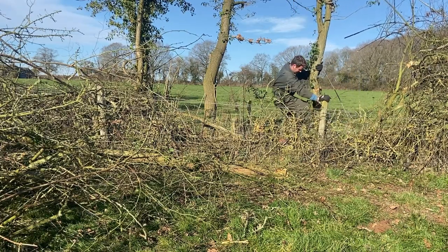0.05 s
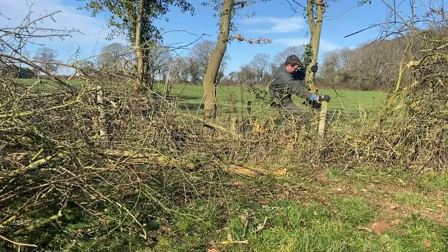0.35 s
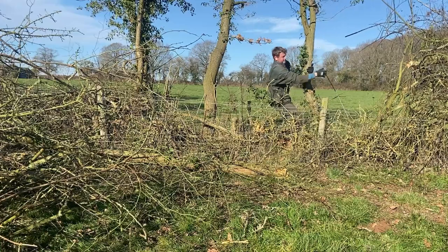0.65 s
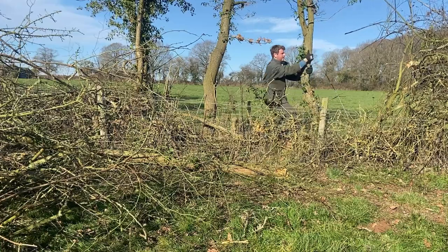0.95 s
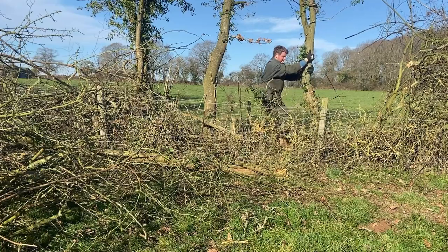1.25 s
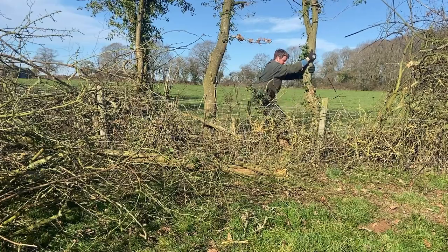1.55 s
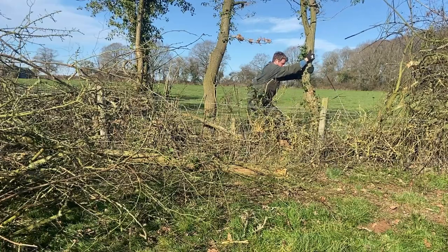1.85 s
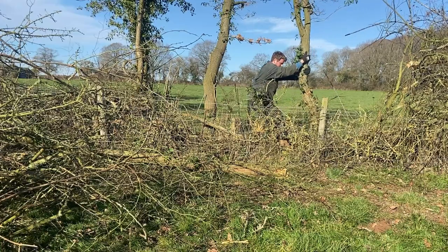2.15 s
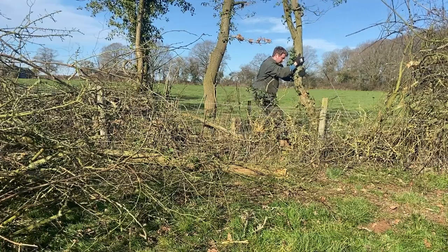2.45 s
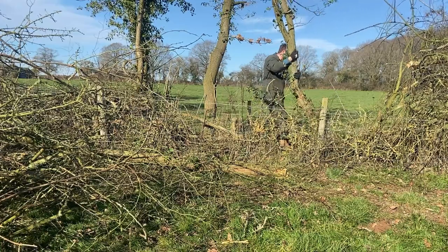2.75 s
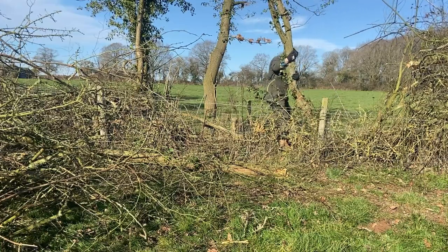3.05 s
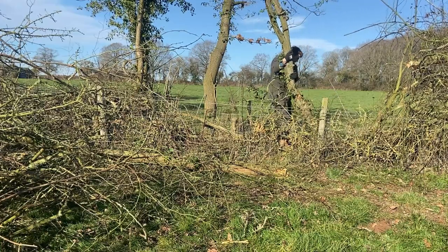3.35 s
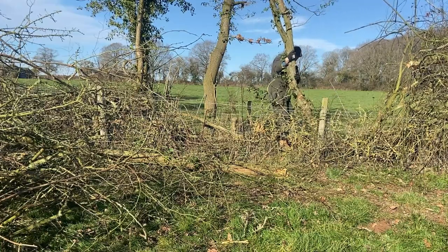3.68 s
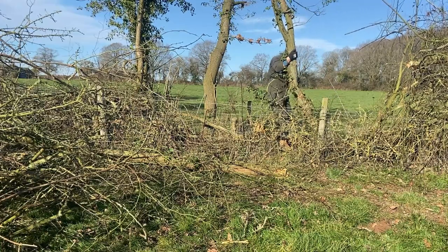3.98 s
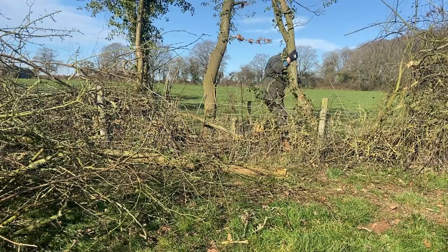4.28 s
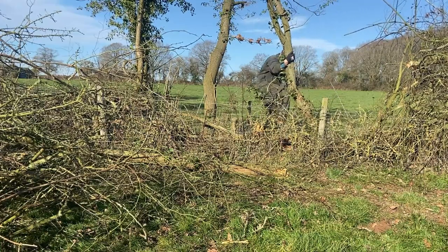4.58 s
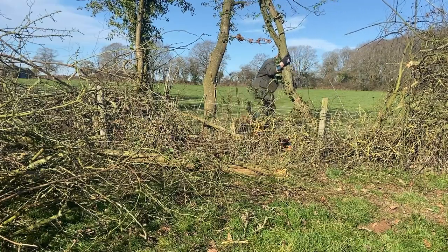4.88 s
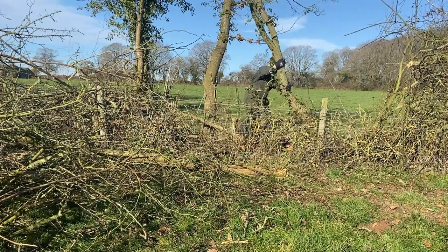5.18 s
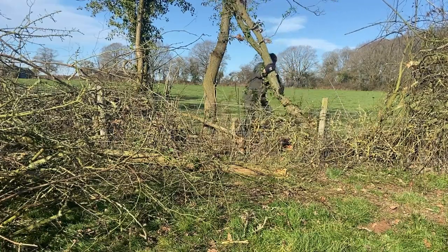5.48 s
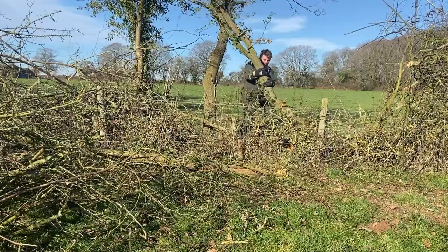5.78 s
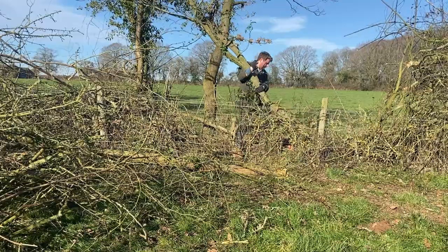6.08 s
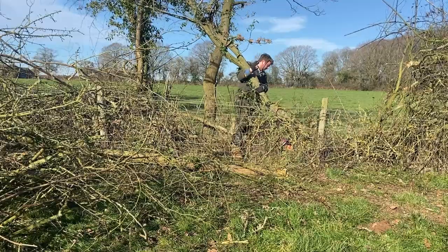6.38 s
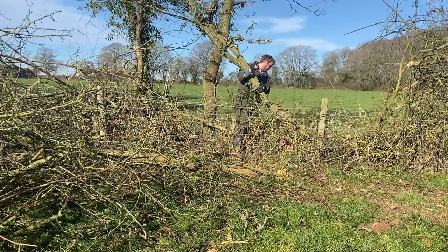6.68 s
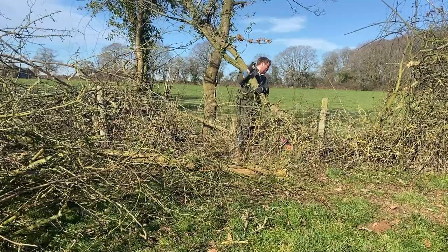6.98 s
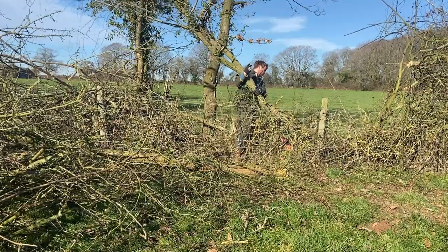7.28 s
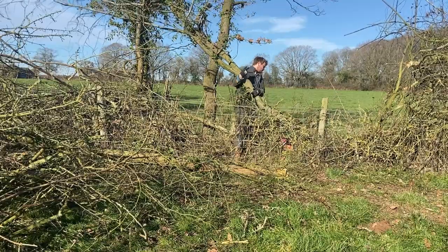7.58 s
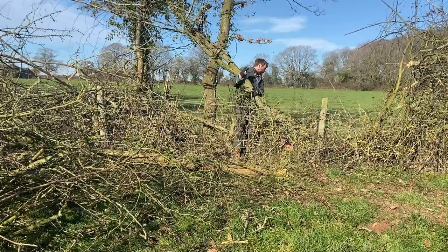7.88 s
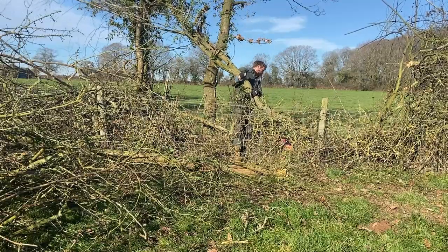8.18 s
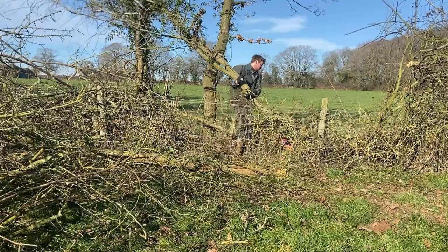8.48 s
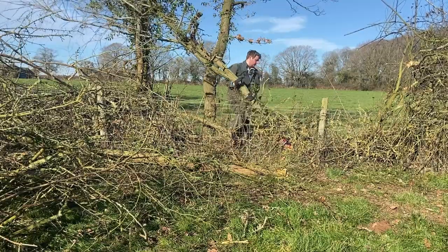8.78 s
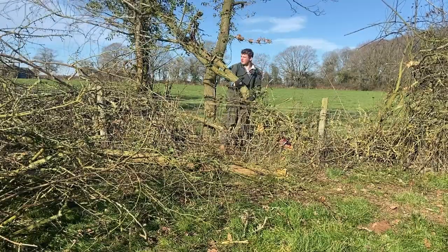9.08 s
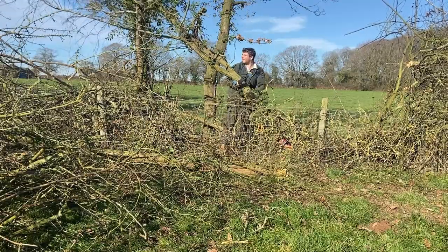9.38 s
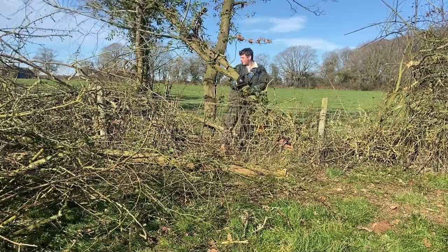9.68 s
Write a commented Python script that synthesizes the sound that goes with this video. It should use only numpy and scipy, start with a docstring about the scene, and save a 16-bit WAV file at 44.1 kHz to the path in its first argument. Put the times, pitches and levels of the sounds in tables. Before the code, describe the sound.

A partly cut trunk snaps and crackles as it bends over into a hedge, amid rustling brush outdoors.

```python
"""A partly cut tree is hauled down sideways onto a laid hedge, at the edge of an open field.
First a breeze buffets the close microphone pair, boots tread the litter, twigs rustle and bark squeaks.
From 2 s fibres in the bent hinge of the trunk snap in a volley; each break rings the stem's modes and
scatters back from the brushwood. The loudest volley comes between 5 and 6.5 s. A boot lands at 7 s,
then lighter cracks and shoves through the brush die away."""
import sys
import numpy as np
from scipy import signal
from scipy.fft import rfft, irfft, next_fast_len
from scipy.io import wavfile

SR = 44100
rng = np.random.default_rng(int(sys.argv[2]) if len(sys.argv) > 2 else 0)


def put_to_file(sound):
    """Save the sound as 16-bit audio at rate SR, in the file named by the first command-line argument."""
    columns = np.atleast_2d(sound).T  # one column per channel
    safe = np.clip(columns, -1, 1)
    whole_steps = np.round(safe * 32767)
    wavfile.write(sys.argv[1], SR, whole_steps.astype(np.int16))


N = 438354
CUTOFF_HZ = 16000


def from_db(db):
    """Amplitude ratio of a level: 20 dB per decade."""
    return 10 ** (np.asarray(db) / 20)


def rms_one(x):
    """Normalisation to unit rms."""
    return x / np.sqrt(np.mean(x ** 2) + 1e-20)


def in_time(curve):
    """Linear interpolation of a curve at every sample."""
    return np.interp(np.arange(N) / SR, *np.transpose(curve))


def at_hz(points, hz):
    """Interpolation on a logarithmic frequency axis."""
    f, value = np.transpose(points)
    return np.interp(np.log(np.maximum(hz, 1)), np.log(f), value)


def bell(middle_s, length_s):
    """Gaussian envelope of unit height."""
    return np.exp(-np.minimum((2 * (np.arange(N) / SR - middle_s) / length_s) ** 2, 30))


def band(x, low_hz, high_hz):
    """Butterworth band-pass."""
    return signal.sosfilt(signal.butter(2, [low_hz, high_hz], "band", fs=SR, output="sos"), x)


def resonate(x, hz, width_hz):
    """Damped oscillator with unit gain at resonance."""
    r = np.exp(-np.pi * width_hz / SR)
    poles = [1, -2 * r * np.cos(2 * np.pi * hz / SR), r * r]
    return signal.lfilter(np.array([1, 0, -1]) * (1 - r * r) / 2, poles, x + 1e-18)


def drift(corner_hz):
    """Random modulation: low-passed noise of unit rms."""
    hop, settle = 40, 2000
    r = np.exp(-2 * np.pi * corner_hz * hop / SR)
    slow = signal.lfilter([1], [1, -2 * r, r * r], rng.standard_normal(N // hop + settle + 2))[settle:]
    return np.interp(np.arange(N) / hop, np.arange(len(slow)), rms_one(slow))


# Likeness of the sound at the two microphones: f/Hz, coherence
COHERENCE = [(30, 0.86), (300, 0.89), (3000, 0.89), (4800, 1), (6000, 0.31), (6900, 1), (13000, 1),
             (16000, .7)]

def stereo_noise(spectrum):
    """Partial coherence: close microphones receive nearly the same coloured noise; unit rms."""
    size = next_fast_len(N)
    hz = np.fft.rfftfreq(size, 1 / SR)
    mid, side = rfft(rng.standard_normal((2, size)))
    alike = np.clip(at_hz(COHERENCE, hz), 0, 1)
    pair = np.sqrt(1 + alike) * mid + np.sqrt(1 - alike) * side * [[1], [-1]]
    return rms_one(irfft(pair * from_db(at_hz(spectrum, hz)))[:, :N])


# Steady breeze: t/s, level/dB
BREEZE = [(0.0, -59.5), (2.4, -51), (3.05, -60), (6.1, -53.5), (6.7, -57), (7.9, -55), (8.5, -48.5),
          (9.93, -53)]
# Gusts: centre t/s, duration/s, level/dB
GUSTS = [(1.168, .1, -52), (1.799, 0.088, -46), (2.01, 0.15, -40.5), (2.199, 0.075, -33.5),
         (2.358, .07, -40.5), (2.543, 0.2, -41), (4.851, 0.23, -49), (7.028, 0.11, -45), (8.14, 0.072, -45),
         (8.38, 0.092, -45), (8.789, 0.077, -41.5)]
# Spectrum of the buffeting: f/Hz, level/dB
WIND_SPECTRUM = [(20, -26.5), (40, -4.5), (62, 3.5), (100, -2), (160, -12), (260, -35), (500, -51.5)]

def breeze():
    """Turbulent pressure: eddies press on the microphone ports; breeze and gusts add in power."""
    power = from_db(in_time(BREEZE)) ** 2
    power += sum((from_db(db) * bell(s, length)) ** 2 for s, length, db in GUSTS)
    return np.sqrt(power) * from_db(-1.8 + 2.65 * drift(18)) * stereo_noise(WIND_SPECTRUM)


# Load on the hinge, as the level of its creaking: t/s, level/dB
STRAIN = [(0.0, -68), (0.22, -70.5), (0.7, -63), (1.72, -64), (1.88, -75), (2.08, -70), (2.6, -57),
          (3.3, -66.5), (4.05, -67), (4.75, -59.5), (5.0, -53.5), (5.7, -51.5), (6.35, -54), (6.8, -64.5),
          (7.4, -61), (8.7, -59.5), (9.93, -64.5)]
# Shoves through the brush: centre t/s, duration/s, twig level/dB, fibre level/dB, litter level/dB
SHOVES = [(0.125, 0.087, -63, -63, -62), (0.351, .13, -47.5, -79, -59.5), (0.466, 0.097, -39, -65, -58),
          (0.609, 0.12, -50.5, -68, -64), (0.833, 0.096, -57.5, -55, -58), (1.177, 0.31, -49, -77, -60.5),
          (1.485, 0.16, -56.5, -59.5, -57.5), (1.671, 0.24, -60.5, -55, -64), (2.521, .14, -47, -52, -54),
          (2.919, 0.19, -54.5, -69, -69), (3.296, 0.088, -49.5, -64, -68), (3.64, 0.2, -53, -58.5, -61.5),
          (3.88, .09, -59, -63, -64), (4.259, 0.2, -48.5, -59.5, -58.5), (6.522, 0.26, -49.5, -66, -59),
          (7.02, .08, -47.5, -49.5, -54), (7.12, 0.081, -50.5, -51.5, -56.5), (7.408, 0.13, -48, -48, -75),
          (7.598, 0.083, -49.5, -58, -50.5), (7.786, 0.0996, -55.5, -54.5, -77),
          (8.15, 0.17, -53, -65, -68), (8.541, 0.34, -45, -52.5, -52), (8.74, .17, -46, -53, -50),
          (8.998, 0.2, -44, -53, -51), (9.2, 0.18, -57.5, -61, -54.5), (9.422, 0.16, -44.5, -75.5, -64.5),
          (9.592, 0.077, -54, -67.5, -54.5), (9.766, 0.058, -58, -73.5, -54)]

def stirring():
    """Incoherent sources add in power: load plus shoves gives the twig, fibre and litter levels."""
    strain_db = in_time(STRAIN)
    power = from_db([strain_db + 3.5, strain_db, strain_db - 5]) ** 2
    for s, length, *levels_db in SHOVES:
        power += np.outer(from_db(levels_db), bell(s, length)) ** 2
    return 10 * np.log10(power)


def grains(spectrum, per_s, spread_db, low_hz, high_hz, q, modes=14):
    """Shot noise: tiny fractures arrive in clumps, each ringing briefly about its own pitch; unit rms."""
    chance, clumps = rng.random(N), from_db(4 * drift(18))
    sizes = from_db(spread_db * np.minimum(rng.exponential(1, N), 3.5)) * rng.choice([-1, 1], N)
    pitch = rng.random(N) * modes
    at = np.flatnonzero(chance < per_s * clumps / SR)
    out = np.zeros((2, N))
    for k, hz in enumerate(np.geomspace(low_hz, high_hz, modes)):
        clicks = np.zeros(N)
        clicks[at] = sizes[at] * np.exp(-((pitch[at] - k) / 6) ** 2)  # spills into neighbouring modes
        clicks[at] *= rng.normal(0.52, 1.0, len(at))
        pan = from_db(rng.normal(0, 1) * np.array([[1], [-1]]))
        out += from_db(at_hz(spectrum, hz)) * pan * resonate(clicks, hz, hz / q)
    return rms_one(out)


# Spectra of twigs, creaking fibres and ground litter: f/Hz, level/dB
TWIG_SPECTRUM = [(400, -10.5), (1000, -4.5), (2000, -5), (3000, 3), (4300, -0.5), (5600, -2.5), (8500, 0),
                 (11500, -2.5), (14000, -10), (16000, -31)]
FIBRE_SPECTRUM = [(400, -10.5), (650, 2), (900, 5.5), (1400, 3), (2000, 1.5), (2800, -2.5), (5000, -24.5)]
LITTER_SPECTRUM = [(100, -3), (170, 3), (280, 3.5), (420, -1), (650, -4), (1200, -32)]

def rustle(twig_db, fibre_db, litter_db):
    """Superposition: harder movement breaks more twigs and fibres; the finest merge into a hiss."""
    busy = from_db(.8 * (twig_db + 54))
    ticks = grains(TWIG_SPECTRUM, per_s=600 * busy, spread_db=12.5, low_hz=1570, high_hz=16000, q=6.2)
    swish = stereo_noise(TWIG_SPECTRUM) * from_db(1.6 * drift(22))
    twigs = from_db(-6.5) * ticks + from_db(-0.5) * swish
    creaks = grains(FIBRE_SPECTRUM, per_s=200 * busy, spread_db=5.5, low_hz=618, high_hz=3820, q=13)
    rubbing = stereo_noise(FIBRE_SPECTRUM) * from_db(3.8 * drift(27))
    fibres = from_db(-3.5) * creaks + from_db(-3) * rubbing
    litter = from_db(1.5) * stereo_noise(LITTER_SPECTRUM) * from_db(2.9 * drift(27))
    return from_db(twig_db) * twigs + from_db(fibre_db) * fibres + from_db(litter_db) * litter


# Faint bark squeaks: t/s, duration/s, start f/Hz, end f/Hz, level/dB
SQUEAKS = [(0.786, 0.073, 2710, 2220, -58), (0.954, 0.087, 751, 1020, -46.5)]

def squeaks():
    """Friction: bark rubs on bark in short, unsteady glides that swell, stutter and stop."""
    out, waver, stutter = np.zeros(N), drift(120), from_db(4.5 * drift(150))
    for s, length, start_hz, end_hz, db in SQUEAKS:
        at, progress = int(s * SR), np.linspace(0, 1, int(length * SR))
        span = slice(at, at + len(progress))
        hz = (start_hz + (end_hz - start_hz) * progress) * (1 + 0.055 * waver[span])
        swell = from_db(db) * np.sin(np.pi * progress ** 1.27)
        out[span] += swell * np.sin(2 * np.pi * np.cumsum(hz) / SR)
    return out * stutter


# Boots landing in the litter: t/s, level/dB, T60/s
STEPS = [(0.316, -50.5, 0.072), (1.454, -48, .06), (4.418, -40, 0.054), (6.977, -30.5, 0.12),
         (8.948, -41, 0.18), (9.054, -32.5, 0.044)]

def steps():
    """Impact noise: each boot gives a soft thump and a crunch that decay exponentially."""
    t, press = np.arange(N) / SR, np.zeros(N)
    for s, db, t60 in STEPS:
        age = np.maximum(t - s, 0)
        press += from_db(db - 60 * age / t60) * (1 - np.exp(-age / 0.00062))
    thump = rms_one(band(rng.standard_normal(N), 255, 490))
    return press * (from_db(-2) * thump + stereo_noise(TWIG_SPECTRUM))


def fracture(t, slip_s, scatter_db, brush_db, brush_t60):
    """Scattering: an impulse and its after-slips, then returns from near stems and the whole hedge."""
    slips = rng.standard_normal(len(t)) * (rng.random(len(t)) < .12) * .5 * np.exp(-t / slip_s)
    slips[0] = 1
    returns = from_db(scatter_db - 60 * t / 0.016) + from_db(brush_db - 60 * t / brush_t60)
    mid, side = rng.standard_normal((2, len(t)))
    diffuse = (mid + 0.49 * side * [[1], [-1]]) * returns * (1 - np.exp(-t / 0.0012))
    return slips / np.linalg.norm(slips) + diffuse


def struck_level(x, db):
    """Normalisation of a transient by the rms of its first 6 ms."""
    return x * from_db(db) / np.sqrt(np.mean(x[:, :int(.006 * SR)] ** 2) + 1e-20)


# Treble of splintering wood: f/Hz, level/dB
SPLINTER_SPECTRUM = [(2500, -9.5), (4000, -0.5), (5000, 0.5), (6400, -1.5), (8500, -0.5), (11500, -1.5),
                     (14000, -13), (16000, -26)]

def splinter(force, size=512):
    """Minimum-phase filtering turns the force into a bright snap with a sharp onset."""
    magnitude = from_db(at_hz(SPLINTER_SPECTRUM, np.fft.rfftfreq(size, 1 / SR)))
    cepstrum = irfft(np.log(magnitude))
    cepstrum[1:size // 2] *= 2
    cepstrum[size // 2 + 1:] = 0
    response = irfft(np.exp(rfft(cepstrum)))
    return signal.fftconvolve(force, response[None])[:, :force.shape[1]]


# Resonances of the green stem: f/Hz, bandwidth/Hz, level/dB
WOOD_MODES = [(764, 67, -10.5), (901, 40, 0), (1244, 160, 0.5), (1475, 172, 3), (1670, 110, 1),
              (2530, 150, -0.5), (2586, 660, 8.5), (2890, 510, 3.5), (3540, 400, -6)]

def wood_modes(force, tuning, spread_db):
    """Modal response: the force rings each resonance with a random strength; one signal per mode."""
    return [from_db(db + rng.normal(0, spread_db)) * resonate(force, hz * tuning, width)
            for hz, width, db in WOOD_MODES]


def small_snaps(per_s=14, middling_load_db=-57):
    """Poisson process: thin twigs give way singly, oftener and louder as the strain rises."""
    t = np.arange(int(.05 * SR)) / SR
    out = np.zeros((2, N + len(t)))
    strain_db = in_time(STRAIN)
    rate = per_s * from_db(1.1 * (strain_db - middling_load_db))
    for at in np.flatnonzero(rng.random(N) < rate / SR):
        force = fracture(t, slip_s=0.0016, scatter_db=-28, brush_db=-46, brush_t60=0.089)
        tuning = np.exp(np.clip(rng.normal(0, 0.17), -.5, .5))
        body = sum(wood_modes(force, tuning, spread_db=3.6))
        db = strain_db[at] + 13 + 3 * np.clip(rng.standard_normal(), -2, 2)
        out[:, at:at + len(t)] += struck_level(body, db) + struck_level(splinter(force), db - 6)
    return out[:, :N]


def stem_ring(t, db, tilt_db, split_hz=2000):
    """Free vibration of the stem after a break; the tilt divides power between upper and lower modes."""
    force = fracture(t, slip_s=0.0011, scatter_db=-29.5, brush_db=-42, brush_t60=0.15)
    tuning = np.exp(rng.normal(0, 0.038))  # every fibre bundle rings a little differently
    modes = wood_modes(force, tuning, spread_db=2.95)
    lower = sum(mode for mode, (hz, _, _) in zip(modes, WOOD_MODES) if hz < split_hz)
    upper = sum(mode for mode, (hz, _, _) in zip(modes, WOOD_MODES) if hz >= split_hz)
    lower, upper = band(lower, 610, 2230), band(upper, 1320, 5200)  # a thin stem radiates little bass
    lower_db = db - 10 * np.log10(1 + from_db(tilt_db) ** 2)
    return struck_level(lower, lower_db) + struck_level(upper, lower_db + tilt_db)


def trunk_after_sound(t, db, break_s):
    """Damped vibration of the trunk: a dull thud, weaker as the hinge tears through, and a hollow ring."""
    thud_db = db - 16 - 1.8 * break_s
    swell = (1 - np.exp(-t / 0.00064)) * from_db(thud_db - 60 * t / 0.098)
    thud = swell * rms_one(band(rng.standard_normal(len(t)), 66, 630))
    hollow_hz = 1050 * np.exp(rng.normal(0, 0.24))
    hollow = rms_one(resonate(rng.standard_normal(len(t)), hollow_hz, width_hz=170))
    return thud + from_db(db - 18.5 - 60 * t / 0.14) * hollow


# Breaks in the hinge: t/s, level/dB, upper over lower modes/dB, relative splinter level/dB
HINGE_BREAKS = [(0.4753, -45, 16, 2), (1.0259, -50, -4, 6.5), (1.2487, -50.5, 12.5, 9.5),
                (1.6457, -37.5, -4.5, -10.5), (2.1474, -26, 7, -1.5), (2.2662, -50, 2, 12.5),
                (2.2753, -29, 11, 1.5), (2.3252, -40, 8.5, 1), (2.406, -23, 8.5, -2), (2.4346, -30, 0, -10),
                (2.4558, -20, 2, -5.5), (2.5122, -24, 5.5, -4.5), (2.5249, -20.5, 4.5, -8.5),
                (2.5727, -20, 4, -9.5), (2.7599, -21, 5.5, -6.5), (2.8081, -23.5, 7.5, -12),
                (2.8844, -38.5, 11, -5.5), (2.919, -39, 6.5, -7), (3.0958, -29.5, 0.5, -7),
                (3.268, -31, 2.5, -10), (3.2743, -23.5, 4, -4), (3.4006, -23, 8.5, -10),
                (4.0449, -45, -8.5, 2), (4.2714, -39, 6, 1.5), (4.283, -36, 17.5, 7.5),
                (4.3741, -39.5, 10.5, -7), (4.8799, -28, 0, -5), (4.9527, -34.5, -2.5, -17.5),
                (5.0146, -31.5, 2, -1.5), (5.0884, -28.5, -0.5, -11.5), (5.175, -14, -.5, -15),
                (5.1866, -26, -7, -2.5), (5.2582, -22.5, 5, -10.5), (5.2672, -15.5, -2, -8.5),
                (5.322, -26, -6, -16), (5.3498, -18, 1.5, -6), (5.3912, -17.5, 1.5, -4),
                (5.4809, -34, 0, -5), (5.5102, -10.5, -4, -12), (5.564, -14, 1.5, -9), (5.5833, -23, 2, -2),
                (5.6603, -28.5, 2.5, -5.5), (5.6877, -11.5, 0, -11), (5.7133, -14, 7.5, -9.5),
                (5.74, -21.5, -0.5, -14), (5.7568, -27, 3.5, -6), (5.7826, -29, 7, -0.5),
                (5.8005, -26.5, 3.5, -6.5), (5.9357, -27.5, 0.5, -6.5), (5.967, -27, 0, 0),
                (6.0265, -26.5, -3.5, -6.5), (6.077, -20, 4, -2), (6.081, -16.5, -1.5, -12.5),
                (6.0979, -21.5, 2.5, -8.5), (6.1481, -9.5, -5, -25), (6.355, -17.5, -7, -9.5),
                (6.3735, -14, 2.5, -12.5), (6.4348, -22.5, 3.5, -4), (6.5626, -36.5, 3, -14),
                (7.2554, -43, 4.5, -4.5), (7.372, -33, 5, -5), (7.4041, -30.5, 1.5, -1.5),
                (7.4297, -33, 8, 1), (7.4418, -32, 0, -3), (7.4843, -37, 2, -2), (7.5418, -38.5, 1, -3),
                (7.5997, -41, -0.5, -3), (7.7433, -33.5, 1.5, -5), (7.8062, -40, -3, -4.5),
                (7.835, -35.5, 7, -8), (7.8621, -37.5, 9, -8), (7.927, -44, -3, -16), (8.0489, -25, 2, -1),
                (8.113, -40, -2, -11), (8.1872, -39, -1, -24), (8.21, -29, 4.5, -2.5),
                (8.5249, -33.5, -1, -2.5), (8.7072, -29, .5, -0.5), (8.9467, -36, 3, 0),
                (9.1608, -44.5, 6, -0.5)]

def cracks():
    """Impulse excitation: each breaking fibre bundle rings the stem, splinters and thuds."""
    t = np.arange(int(.4 * SR)) / SR
    out = np.zeros((2, N + len(t)))
    for s, db, tilt_db, snap_db in HINGE_BREAKS:
        body = stem_ring(t, db, tilt_db) * from_db([[-.5], [.3]])  # slightly to the right
        tear = fracture(t, slip_s=0.0016, scatter_db=-26, brush_db=-34.5, brush_t60=0.15)
        snap = struck_level(splinter(tear), db + snap_db)
        crack = from_db(1.5) * body + from_db(0.4) * snap
        at = int(s * SR)
        out[:, at:at + len(t)] += crack + trunk_after_sound(t, db, s)
        for lead_s, lead_db in ((.001, -13.5), (.004, -31)):  # faint copies lead into each crack
            start = at - int(rng.uniform(0.72, 1.5) * lead_s * SR)
            out[:, start:start + len(t)] += from_db(lead_db) * crack
    return out[:, :N]


def scene():
    """Linear superposition of the breaking stem, the boots, the stirred hedge and the air."""
    return cracks() + small_snaps() + steps() + rustle(*stirring()) + squeaks() + breeze()


# Balance of the microphones: f/Hz, left over right level/dB
BALANCE = [(100, 0.5), (700, -1.5), (1300, -1), (3000, 0), (4500, .5), (5700, 3.5), (7200, 0.5), (9000, 0)]
# Phase between the microphones: f/Hz, lead of the left/rad
PHASE_LEAD = [(0, 0), (900, -.3), (1900, -.25), (3000, 0), (4700, -.15), (5900, -1.8), (6400, 0),
              (7400, -.2), (9000, -3.14), (11000, -6.2), (11600, -6.5), (13100, -9.42), (14800, -12.5)]

def record(dry):
    """Interchannel level and phase differences, then soft saturation of the peaks and a steep low-pass."""
    size = next_fast_len(N + 2048)
    hz, sides = np.fft.rfftfreq(size, 1 / SR), np.array([[.5], [-.5]])
    balance = from_db(sides * at_hz(BALANCE, hz))
    balance /= np.sqrt(np.mean(balance ** 2, axis=0))
    turn = np.exp(1j * sides * np.interp(hz, *np.transpose(PHASE_LEAD)))
    pair = irfft(rfft(dry, size) * balance * turn, size)[:, :N]
    rounded = 1.1 * np.tanh(pair / 1.1)
    return signal.sosfilt(signal.ellip(10, .1, 80, CUTOFF_HZ, fs=SR, output="sos"), rounded)


dry = scene()
out = record(dry)
put_to_file(out)
```